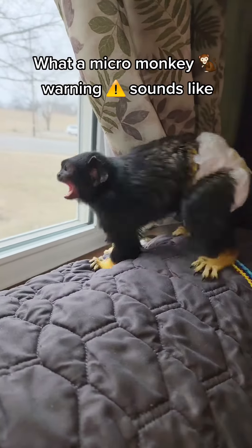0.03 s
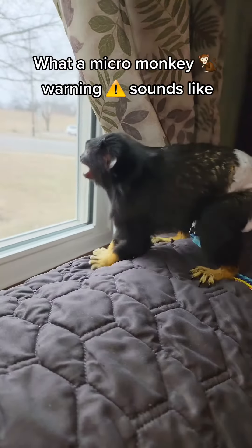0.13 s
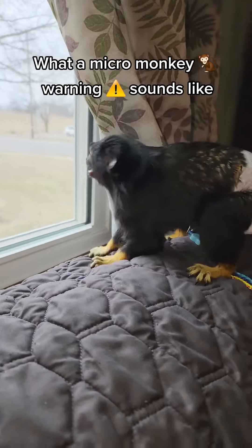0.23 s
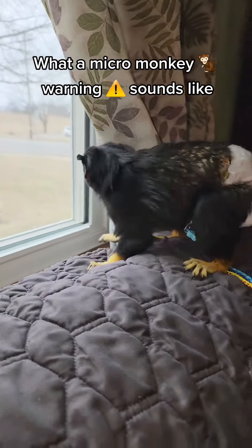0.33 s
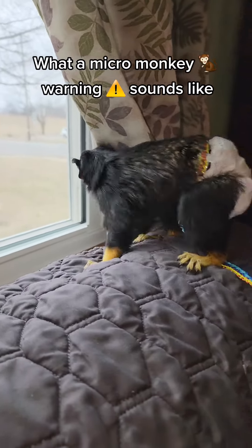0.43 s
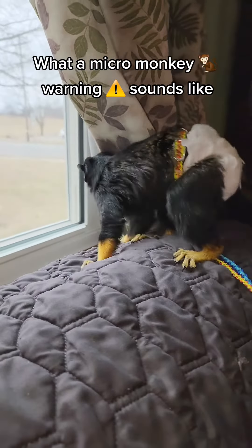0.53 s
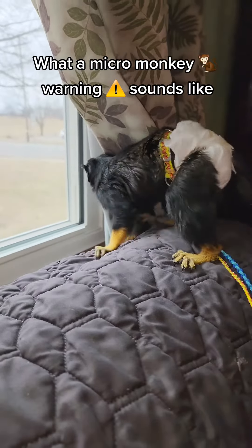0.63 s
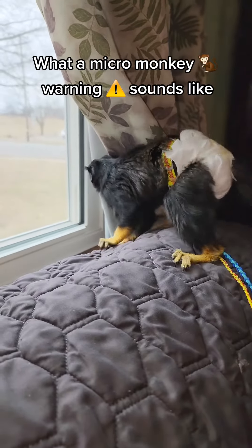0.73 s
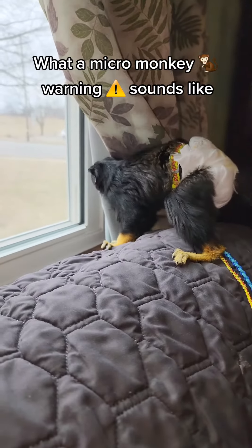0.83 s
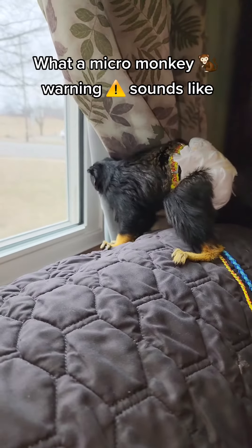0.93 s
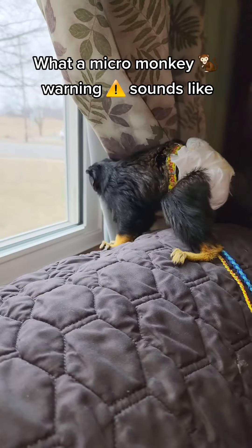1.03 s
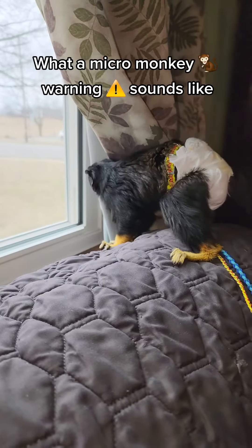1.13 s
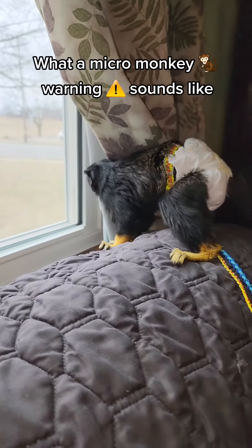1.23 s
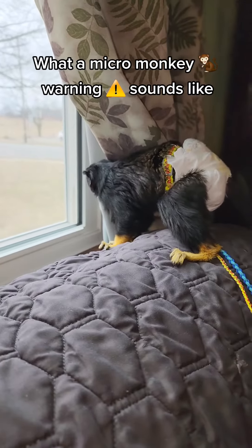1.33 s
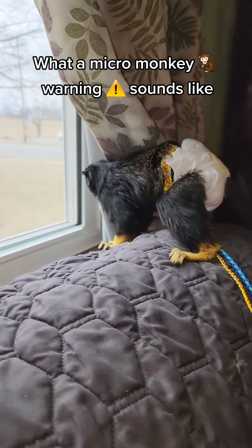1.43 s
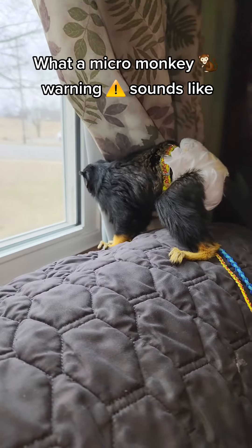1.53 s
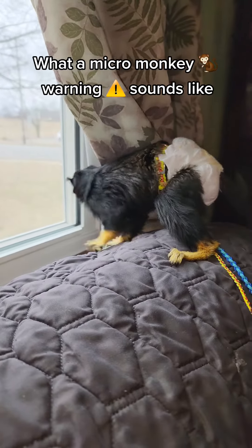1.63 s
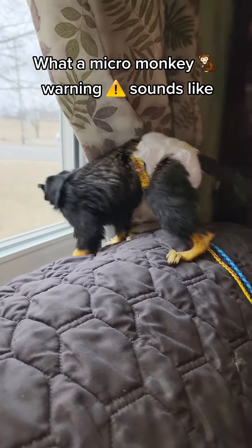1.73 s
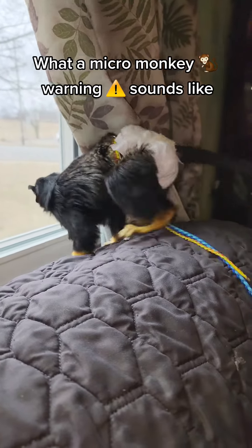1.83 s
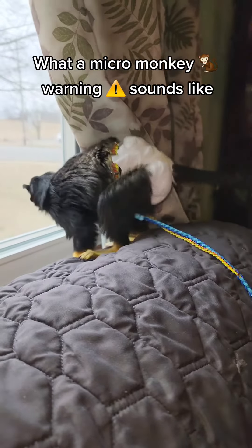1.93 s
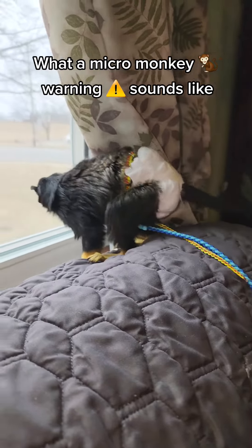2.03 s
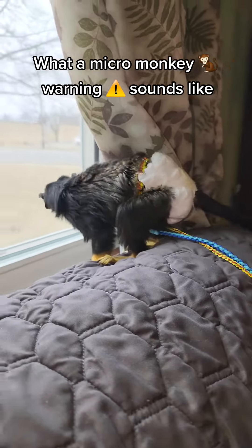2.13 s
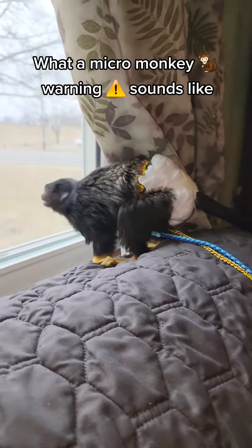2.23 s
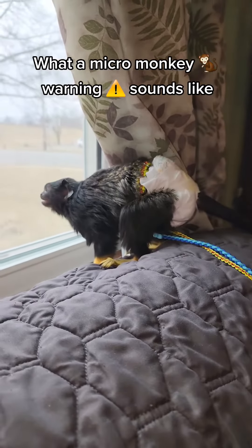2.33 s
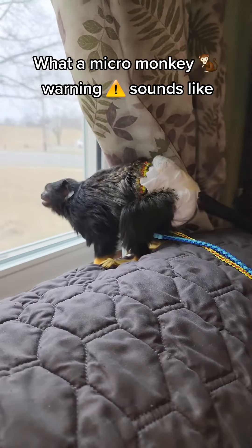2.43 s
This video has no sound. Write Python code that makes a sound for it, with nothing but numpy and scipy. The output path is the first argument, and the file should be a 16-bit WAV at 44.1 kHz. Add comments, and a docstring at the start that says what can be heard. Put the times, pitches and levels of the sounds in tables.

```python
"""Tamarin warning chirps by a window

Small room, a phone's stereo microphones, the left one about 5 cm nearer the tamarin on its cushion.
Two bursts of piercing chirps, each a soft lead-in note then two loud ones, are gliding harmonic tones.
Two faint squeaks between them are steadier tones; rustles and padded steps are shaped noise.
Wall echoes and decaying noise ring after each sound; filtered noise and wavering tones make the low hum.
"""
import sys
import numpy as np
from scipy import signal
from scipy.fft import rfft, irfft, next_fast_len
from scipy.io import wavfile
from scipy.ndimage import uniform_filter1d, minimum_filter1d, map_coordinates

SR = 44100
rng = np.random.default_rng(int(sys.argv[2]) if len(sys.argv) > 2 else 0)


def generate_wav(sig):
    """Save sig (samples, or channels by samples) to the path in sys.argv[1] as 16-bit PCM at SR."""
    pcm = np.round(np.clip(np.atleast_2d(sig).T, -1, 1) * 32767).astype(np.int16)
    wavfile.write(sys.argv[1], SR, pcm)


N = 110250  # samples, 2.5 s

# House floor noise, spectrum shape: (frequency [Hz], density [dB per Hz, relative])
FLOOR_SPECTRUM = [(20, -9), (42, -4.5), (55, -8), (110, -7.5), (190, -19), (240, -24.5), (285, -18.5),
                  (330, -33.5), (450, -34), (680, -32.5), (1500, -43), (4000, -52), (8000, -62.5),
                  (16000, -73.5)]
# Likeness of the floor noise at the two microphones: (frequency [Hz], likeness [0 to 1])
FLOOR_LIKENESS = [(60, .99), (150, 0.97), (300, .8), (600, .4), (1500, 0.14), (8000, 0.028)]
# Balance of the floor noise: (frequency [Hz], left minus right [dB])
FLOOR_BALANCE = [(100, 0.5), (500, 5), (4000, 2.5)]
# Slow swell of the low rumble: (time [s], level [dB])
RUMBLE_SWELL = [(0, -3), (.4, 0), (.9, 1.5), (1.4, -0.5), (1.7, -3), (2.0, 4.5), (2.25, 2), (2.5, 3.5)]
# Wavering hum tones: (frequency [Hz], RMS level [dB])
HUM_TONES = [(38.5, -67), (65.5, -58.5), (286, -79.5)]
# Soft rustles and hisses as the animal shifts:
# (time [s], length [s], level [dB], centre [Hz], width [octaves])
RUSTLES = [(.082, .01, -64.5, 1990, .2), (0.081, 0.021, -59.5, 4860, .15), (0.088, .1, -64, 6000, 0.42),
           (0.1, 0.021, -51.5, 5380, 0.14), (0.175, 0.061, -49.5, 6500, 0.86), (.44, 0.034, -71, 5300, .4),
           (0.533, 0.026, -70, 5300, 0.3), (0.612, 0.027, -71.5, 5200, 0.38), (0.759, 0.15, -66, 950, 0.44),
           (.797, 0.033, -67.5, 4520, 0.67), (0.801, .11, -65, 2900, 0.77), (0.851, .21, -68.5, 970, 1.5),
           (1.049, 0.014, -64.5, 1214, .12), (1.739, 0.068, -67.5, 1980, .2),
           (1.739, 0.044, -71.5, 5500, 0.77), (1.758, .032, -59.5, 4800, 0.27),
           (1.818, 0.067, -62, 6000, 0.57), (1.8, 0.38, -68, 2500, 1.3), (2.131, 0.08, -73, 5000, 0.96),
           (2.251, 0.058, -64.5, 3500, .5)]
# Warning chirps, harmonic levels before the throat, pitches before scoop and sag:
# (time [s], length [s], start pitch [Hz], end pitch [Hz], fundamental [dB], 2nd harmonic [dB],
#  3rd harmonic [dB], left minus right [dB])
CHIRPS = [(0.1078, .009, 5144, 5400, -31.5, -52, -69.5, 4.5),
          (0.224, .017, 3662, 4840, -4, -2.5, -26.5, -1.5),
          (0.2958, .012, 3928, 3887, -7.5, -12.5, -35.5, 15.5),
          (1.876, .006, 4906, 4450, -23.5, -17, -82, 3.5),
          (1.934, 0.016, 3973, 4473, -10.5, -11, -42.5, 7.5),
          (2.0016, 0.011, 3681, 3807, -8.5, -15, -38.5, 10.5)]
# Throat resonances and gaps: (frequency [Hz], gain [dB])
THROAT_RESPONSE = [(3500, -5.5), (3900, -9), (4400, 3.5), (5300, 1.5), (7000, -3), (7550, -4.5), (8300, -6),
                   (9300, -17.5), (10500, -5), (11500, 1.5), (12500, -3.5), (13500, -16.5), (15000, 0.5),
                   (15800, -10.5)]
# Faint squeaks, pitches before scoop and sag:
# (time [s], length [s], start pitch [Hz], end pitch [Hz], levels of harmonics 1 to 5 [dB, five columns])
SQUEAKS = [(.831, 0.0158, 2893, 2520, -57, -60, -52.5, -58, -64),
           (1.028, 0.031, 2312, 2252, -48.5, -66.5, -67.5, -73.5, -86)]
# Steps on the cushion, level before rise and decay: (time [s], level [dB])
STEPS = [(1.17, -64.5), (2.266, -48), (2.298, -57), (2.336, -63.5)]
# Spectrum of a padded step: (frequency [Hz], gain [dB])
CUSHION_SPECTRUM = [(60, 2.5), (200, -3.5), (420, -0.5), (750, -25.5), (1500, -19.5), (2500, -32),
                    (8000, -43), (11000, -46), (16000, -60)]
# Echoes off nearby surfaces: (delay [s], left level [dB], right level [dB])
WALL_ECHOES = [(.0034, -19.5, -10), (.0073, -20, -15.5), (0.0278, -19.5, -28.5)]
# Decay of the room: (frequency [Hz], time to fall 60 dB [s])
ROOM_DECAY = [(500, 0.4), (4000, 0.27), (8000, 0.25), (12000, 0.21), (16000, 0.067)]

FLOOR_DB = -54.5  # RMS, before the rumble swells
RUMBLE_TOP_HZ, HUM_WAVER_DB = 400, 6
RUSTLE_GRAIN_DB, RUSTLE_PAN_DB = 2, 9  # pans are left minus right
ATTACK_S, RELEASE_SHARE = 0.0027, 0.6  # release as a share of note length
FOURTH_DB, RASP_DB = -20, -42.5  # against the 3rd harmonic; against the fundamental's set level
# Chirp unsteadiness; jitter is a share of the pitch, rate in random knots per second
JITTER, SHIMMER_DB, FLUTTER_RATE = 0.018, 0.58, 650
# Chirps slide up from below and sag as they stop (shares of the pitch)
SCOOP, SCOOP_S, SAG = 0.066, 0.0016, 0.053
# Unsteadiness is the share of chirp jitter, shimmer, scoop and sag
SQUEAK_ATTACK_S, SQUEAK_UNSTEADY = 0.004, .2
STEP_RISE_S, STEP_T60_S = 0.0022, 0.31
LEFT_LEAD_S = 0.00014  # the left microphone hears the animal first
ROOM_DB, ROOM_ONSET_S = -16, .006
EARLY_DB, EARLY_T60_S = -13, .06
TOP_HZ = 15850  # band limit
CEILING, LIMIT_HOLD = .97, 89  # share of full scale; samples


def amp(db):
    """Amplitude factor for a level in dB."""
    return 10 ** (np.asarray(db) / 20)


def unit(x):
    """Scale to an RMS of one."""
    return x / np.sqrt(np.mean(x ** 2) + 1e-20)


def along(points, hz):
    """Read (frequency [Hz], value) points on a log frequency axis."""
    f, v = np.transpose(points)
    return np.interp(np.log(hz + 1), np.log(f + 1), v)


def wobble(rate, size):
    """A smooth random curve with rate knots per second."""
    knots = rng.standard_normal(512)
    return map_coordinates(knots, [np.arange(size) * rate / SR], mode="wrap")


def filtered(x, response):
    """Multiply the spectrum of x by a response given as a function of frequency."""
    n = x.shape[-1]
    m = next_fast_len(n + 8192)
    return irfft(rfft(x, m) * response(np.fft.rfftfreq(m, 1 / SR)), m)[..., :n]


def band(hz, centre_hz, octaves):
    """A bell-shaped band on a log frequency axis."""
    return np.exp(-.5 * (np.log2((hz + 1) / centre_hz) / octaves) ** 2)


def swell(t, length, attack, release):
    """Rounded attack, hold and release."""
    rise = np.sin(np.pi / 2 * np.clip(t / attack, 0, 1)) ** 2
    fall = np.sin(np.pi / 2 * np.clip((length - t) / release, 0, 1)) ** 2
    return rise * fall


def add(track, s, x, pan_db=0):
    """Mix a mono sound into a stereo track at time s, pan_db louder at left than right."""
    part = track[:, round(s * SR):][:, :len(x)]
    part += amp([[pan_db / 2], [-pan_db / 2]]) * x[:part.shape[1]]


def hum():
    """House rumble as partly shared stereo noise that slowly swells, with a few wavering tones."""
    t = np.arange(N) / SR

    def spread(hz):
        # the angle between mid and side sets how alike the microphones sound
        angle = np.arccos(np.clip(along(FLOOR_LIKENESS, hz), -1, 1)) / 2
        return amp(along(FLOOR_SPECTRUM, hz)) * [np.cos(angle), np.sin(angle)]

    def balance(hz):
        return amp(along(FLOOR_BALANCE, hz) * np.array([[.5], [-.5]]))

    mid, side = filtered(rng.standard_normal((2, N)), spread)
    air = unit(filtered(np.array([mid + side, mid - side]), balance))
    rumble = filtered(air, lambda hz: 1 / (1 + (hz / RUMBLE_TOP_HZ) ** 2))
    air = air - rumble + rumble * amp(np.interp(t, *np.transpose(RUMBLE_SWELL)))
    tones = np.zeros(N)
    for hz, db in HUM_TONES:
        waver = amp(HUM_WAVER_DB * wobble(15, N))
        tones += amp(db) * unit(waver * np.sin(2 * np.pi * hz * t + .5 * wobble(14, N)))
    return amp(FLOOR_DB) * air + tones


def rustles():
    """Fur and fabric brushing: bands of noise that swell and fade with a grainy level."""
    out, t = np.zeros((2, N)), np.arange(SR // 2) / SR
    for s, length, db, centre_hz, octaves in RUSTLES:
        brush = unit(filtered(rng.standard_normal(len(t)), lambda hz: band(hz, centre_hz, octaves)))
        level = amp(db + RUSTLE_GRAIN_DB * wobble(150, len(t)))
        add(out, s, level * brush * swell(t, length, length / 2, length / 2), RUSTLE_PAN_DB)
    return out


def note(length, start_hz, end_hz, levels, attack, throat, unsteady):
    """One gliding call whose harmonics sweep through the throat response, with a little noisy rasp."""
    t = np.arange(SR // 16) / SR
    progress = np.clip(t / length, 0, 1)
    glide = start_hz + (end_hz - start_hz) * (1 - np.cos(np.pi * progress)) / 2
    jitter = JITTER * wobble(FLUTTER_RATE, len(t))
    bend = jitter - SCOOP * np.exp(-t / SCOOP_S) - SAG * progress ** 6
    pitch = glide * (1 + unsteady * bend)
    phase = 2 * np.pi * np.cumsum(pitch) / SR
    tone = np.zeros(len(t))
    for k, db in enumerate(levels, 1):
        shimmer = unsteady * SHIMMER_DB * wobble(FLUTTER_RATE, len(t))
        in_band = k * pitch < TOP_HZ
        tone += amp(db + throat(k * pitch) + shimmer) * np.sin(k * phase) * in_band
    hiss = filtered(rng.standard_normal(len(t)), lambda hz: band(hz, centre_hz=5030, octaves=0.93))
    rasp = amp(levels[0] + RASP_DB) * unit(hiss)
    return (tone + rasp) * swell(t, length, attack, RELEASE_SHARE * length)


def chirps():
    """Rough warning chirps: four harmonics coloured by the throat."""
    out = np.zeros((2, N))
    for s, length, start_hz, end_hz, first, second, third, pan_db in CHIRPS:
        levels = (first, second, third, third + FOURTH_DB)
        call = note(length, start_hz, end_hz, levels, ATTACK_S, lambda hz: along(THROAT_RESPONSE, hz), 1)
        add(out, s, call, pan_db)
    return out


def squeaks():
    """Faint, steadier squeaks: five harmonics at their own levels, with a flat throat."""
    out = np.zeros((2, N))
    for s, length, start_hz, end_hz, *levels in SQUEAKS:
        call = note(length, start_hz, end_hz, levels, SQUEAK_ATTACK_S, np.zeros_like, SQUEAK_UNSTEADY)
        add(out, s, call, pan_db=7)
    return out


def steps():
    """Padded steps: cushion-coloured noise that rises fast and dies away exponentially."""
    out, t = np.zeros((2, N)), np.arange(SR // 2) / SR
    for s, db in STEPS:
        thud = unit(filtered(rng.standard_normal(len(t)), lambda hz: amp(along(CUSHION_SPECTRUM, hz))))
        rise = 1 - np.exp(-t / STEP_RISE_S)
        add(out, s, amp(db - 60 * t / STEP_T60_S) * rise * thud, pan_db=3)
    return out


def room(x):
    """Direct sound, echoes off the pane and frame, early scatter and a tail whose treble dies first."""
    lag = np.array([[-.5], [.5]]) * LEFT_LEAD_S

    def delay(hz, s):
        return np.exp(-2j * np.pi * hz * s)

    def direct_and_echoes(hz):
        echoes = sum(amp([[left], [right]]) * delay(hz, s + lag) for s, left, right in WALL_ECHOES)
        return delay(hz, lag) + echoes

    near = filtered(x, direct_and_echoes)
    hz, frames, z = signal.stft(rng.standard_normal((2, SR // 2)), SR, nperseg=256)
    decay = amp(-60 * frames / along(ROOM_DECAY, hz)[:, None])
    tail = signal.istft(z * decay, SR, nperseg=256)[1]
    t = np.arange(tail.shape[1]) / SR
    onset = np.clip(t / ROOM_ONSET_S, 0, 1) ** 2
    tail = tail * onset
    early = rng.standard_normal(tail.shape) * amp(-60 * t / EARLY_T60_S) * onset
    # both parts are scaled by the energy of their left channel
    answer = amp(ROOM_DB) * tail / np.linalg.norm(tail[0])
    answer += amp(EARLY_DB) * early / np.linalg.norm(early[0])
    ring = signal.fftconvolve(x.mean(0)[None], answer, axes=1)[:, :N]
    return near + ring * amp([[1.5], [-1.5]])  # ring leans left


def scene():
    """The animal in its room, over the hum."""
    animal = rustles() + chirps() + squeaks() + steps()
    return room(animal) + hum()


def record(dry):
    """The phone turns down the loudest peaks in both channels, then cuts all above its band limit."""
    needed = CEILING / np.maximum(np.abs(dry).max(0), CEILING)
    gain = uniform_filter1d(minimum_filter1d(needed, 2 * LIMIT_HOLD), LIMIT_HOLD)
    return filtered(dry * gain, lambda hz: hz < TOP_HZ)


dry = scene()
out = record(dry)
generate_wav(out)
```